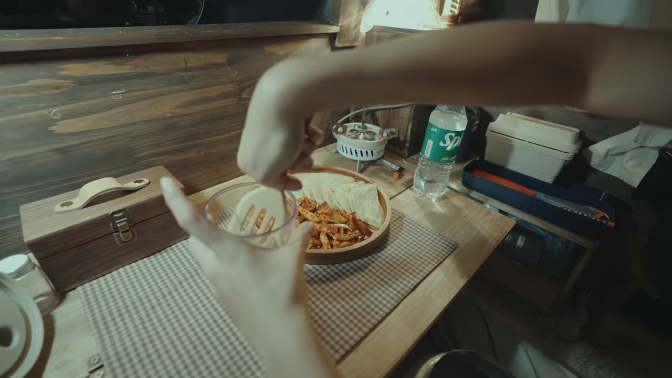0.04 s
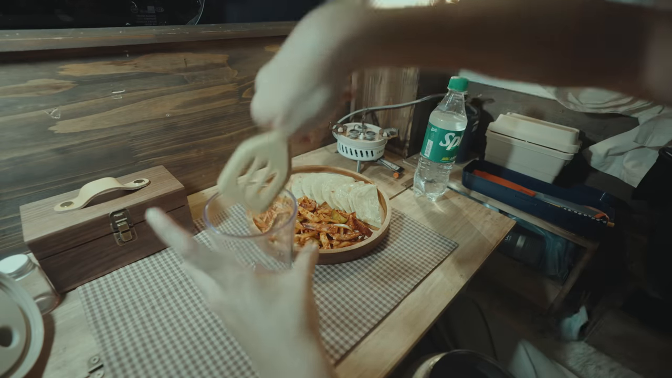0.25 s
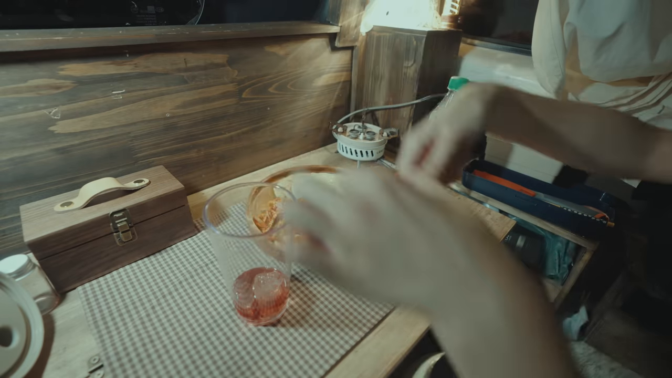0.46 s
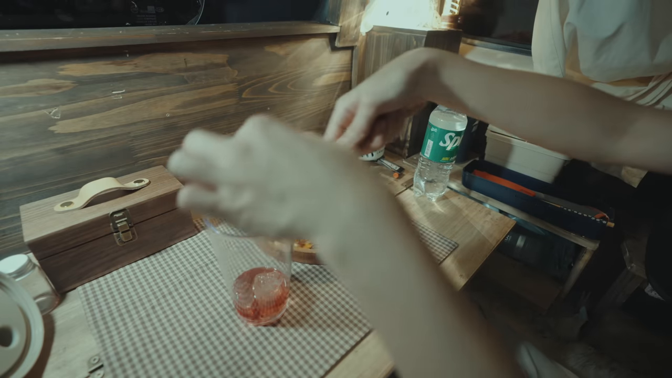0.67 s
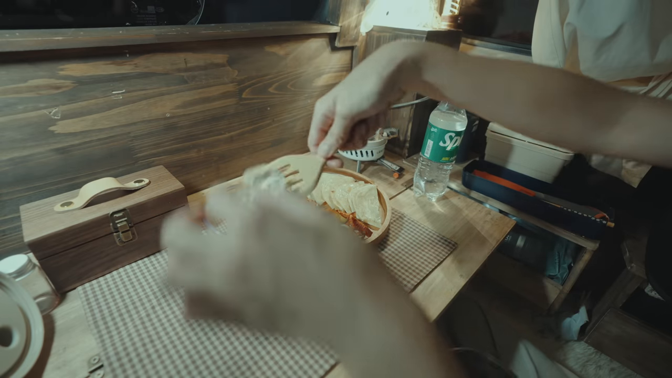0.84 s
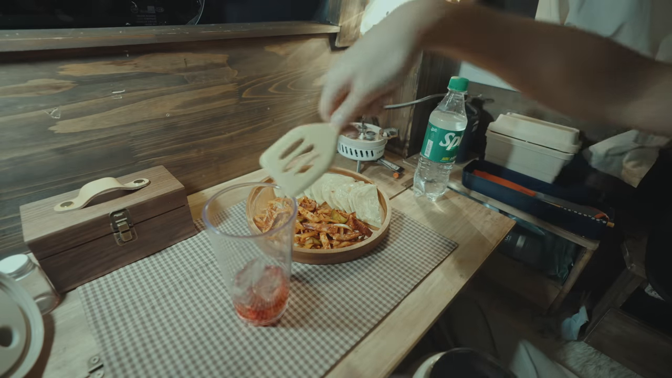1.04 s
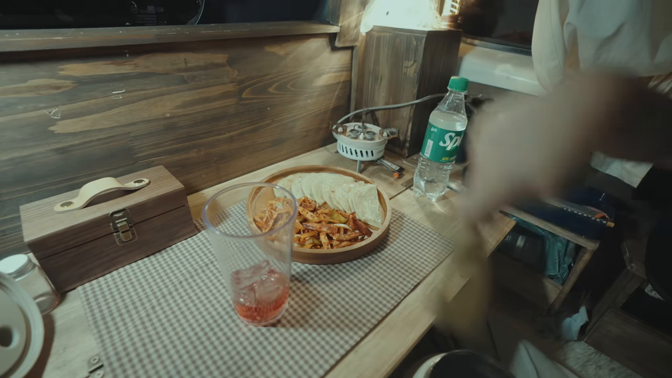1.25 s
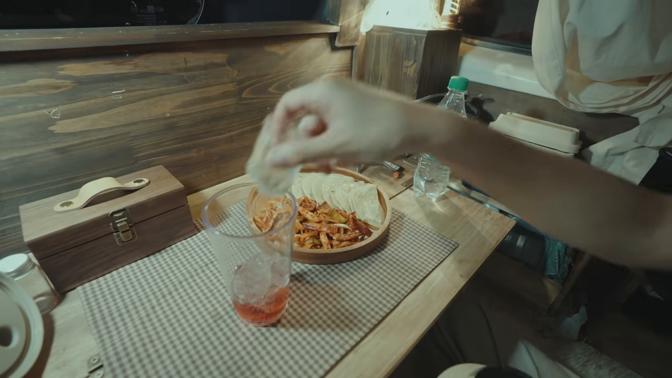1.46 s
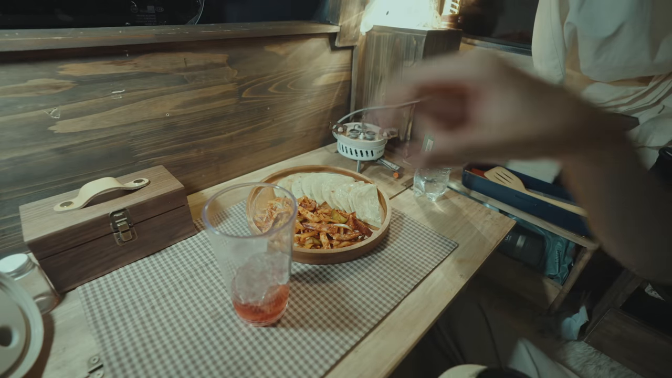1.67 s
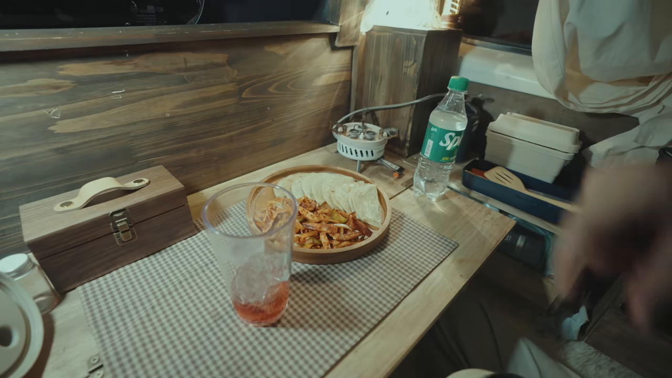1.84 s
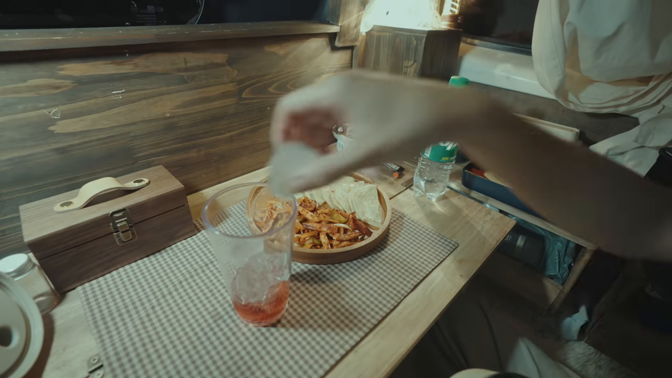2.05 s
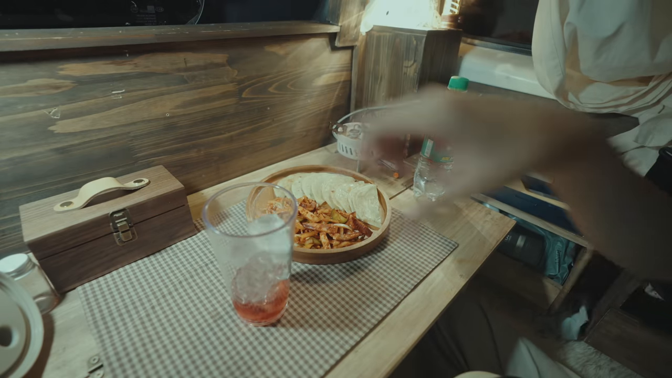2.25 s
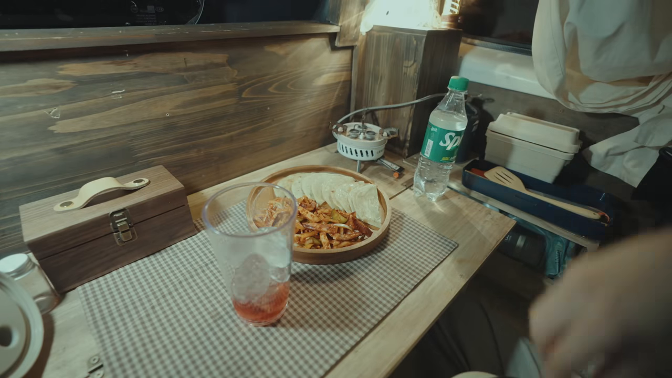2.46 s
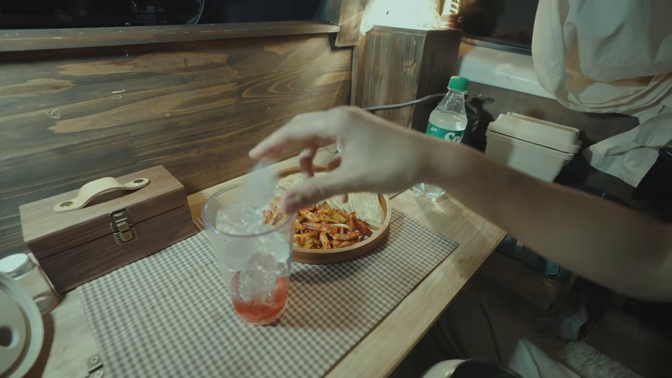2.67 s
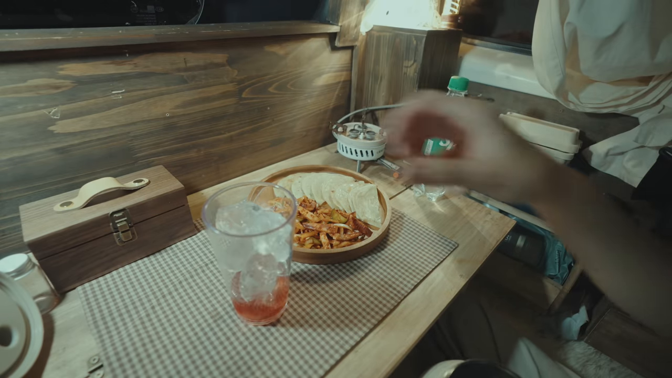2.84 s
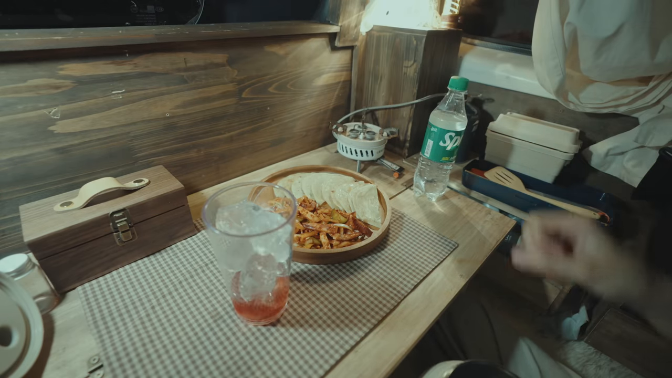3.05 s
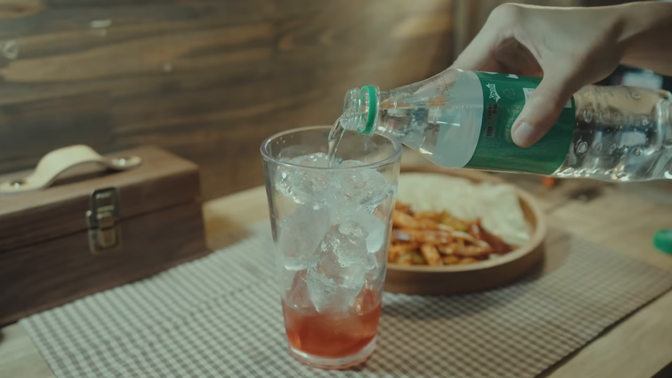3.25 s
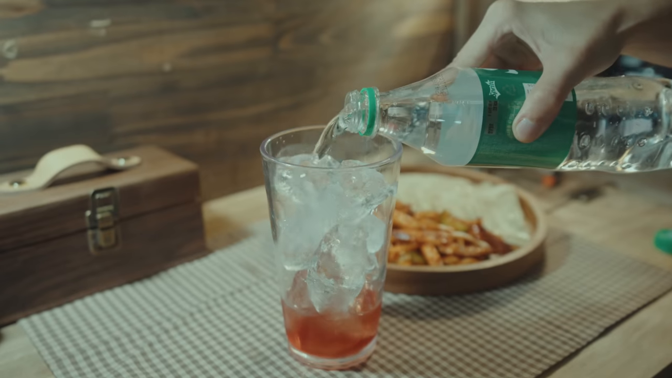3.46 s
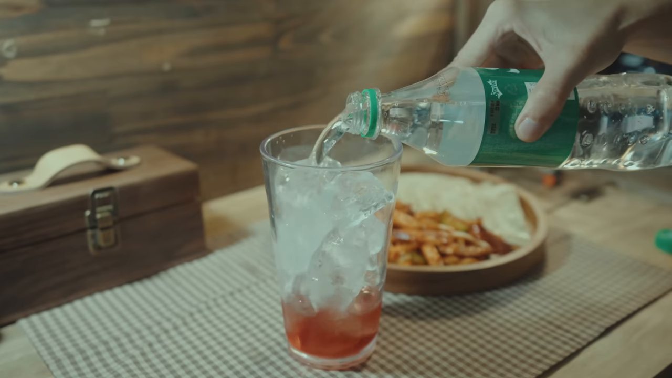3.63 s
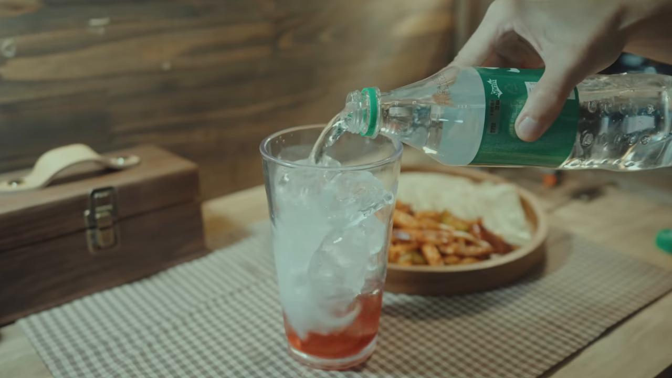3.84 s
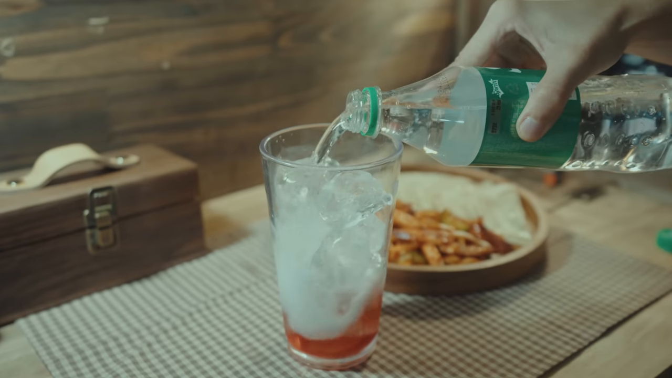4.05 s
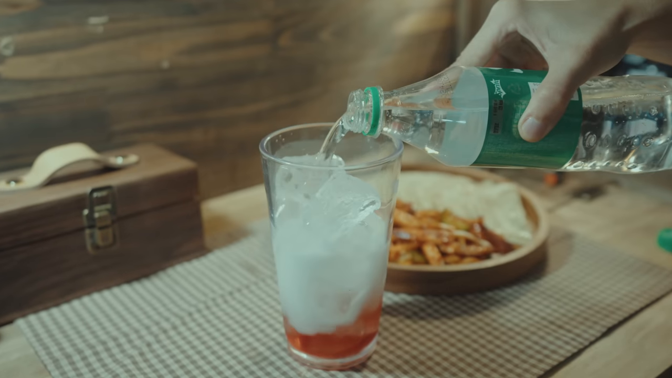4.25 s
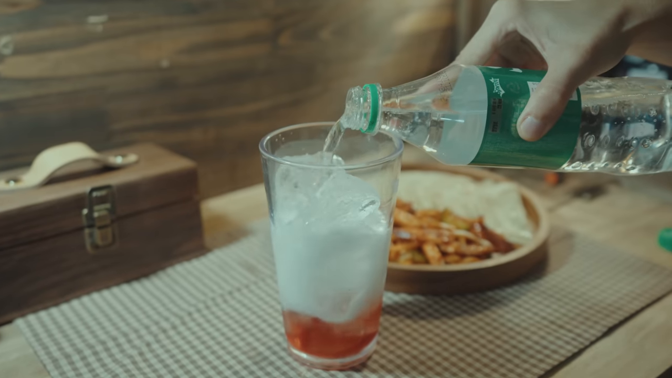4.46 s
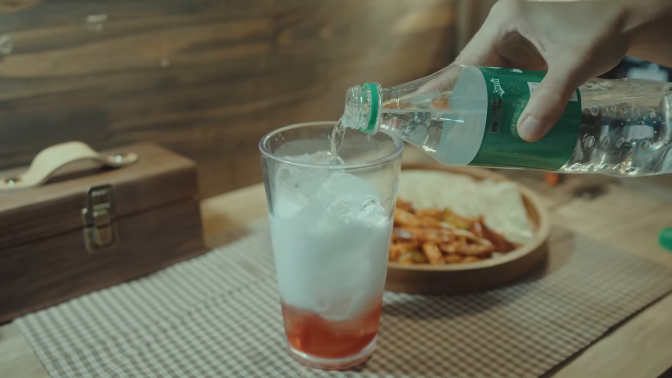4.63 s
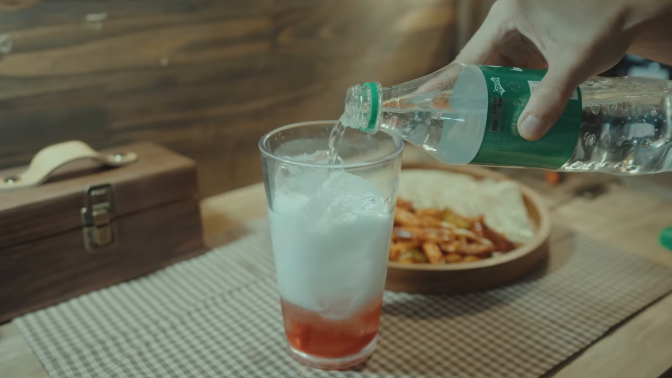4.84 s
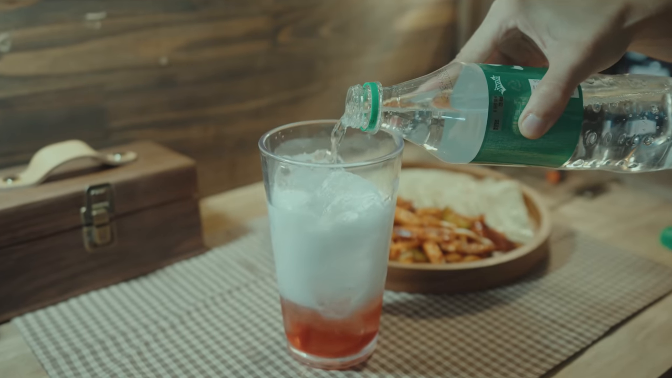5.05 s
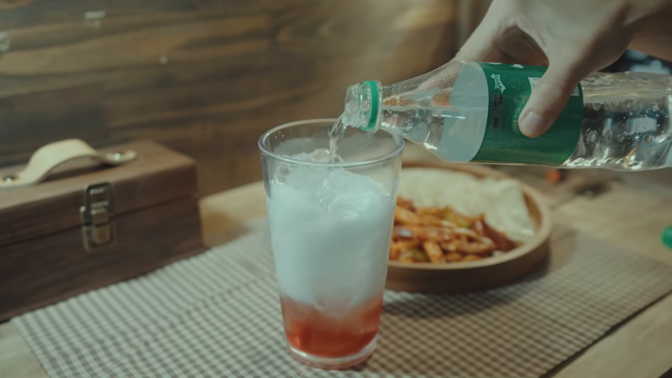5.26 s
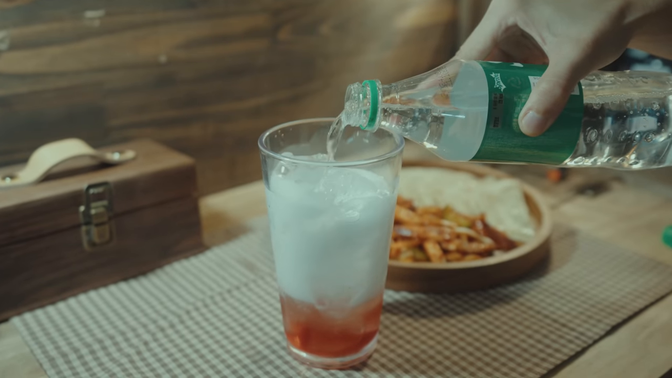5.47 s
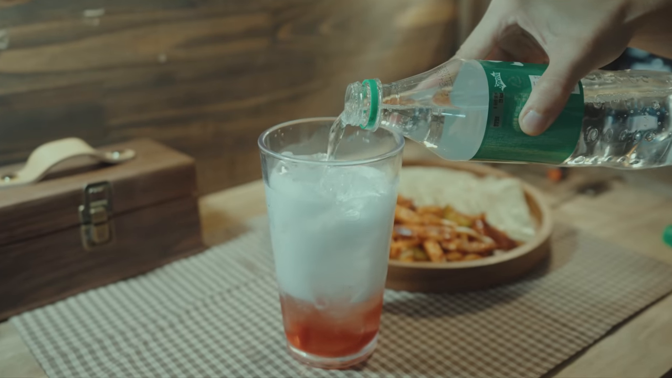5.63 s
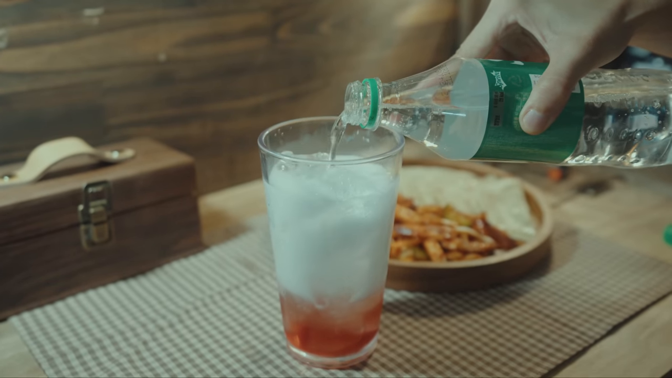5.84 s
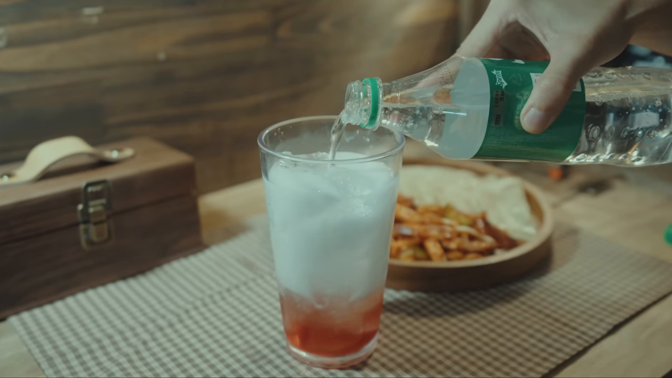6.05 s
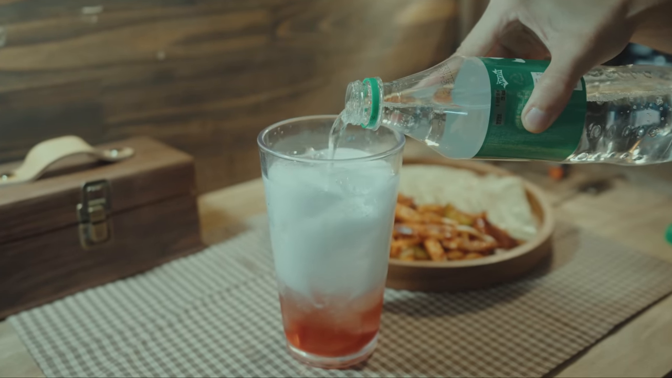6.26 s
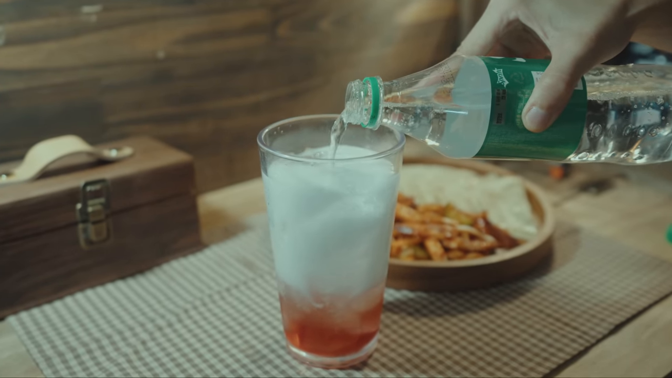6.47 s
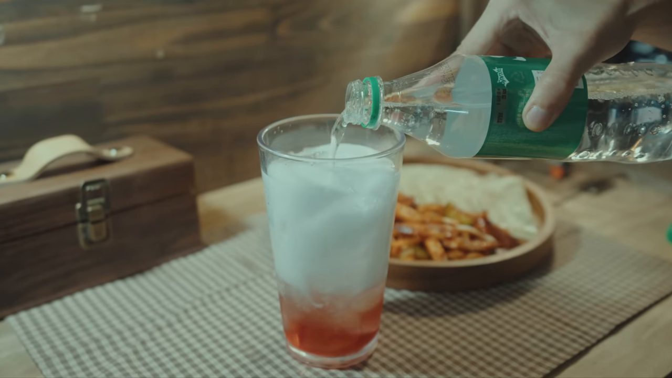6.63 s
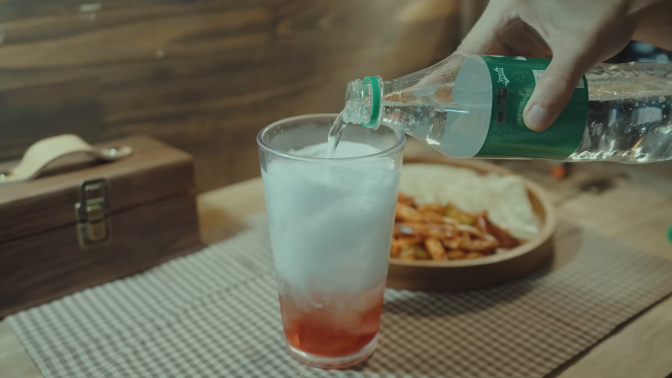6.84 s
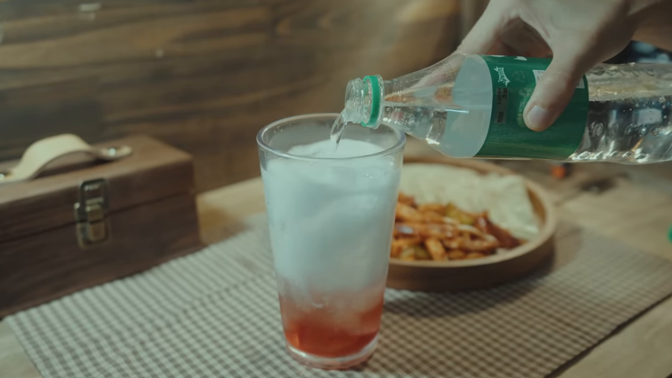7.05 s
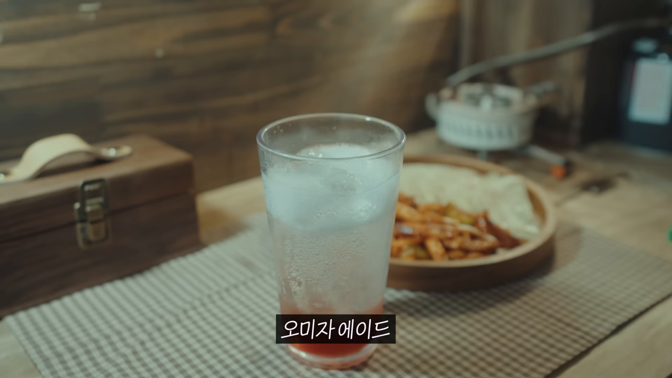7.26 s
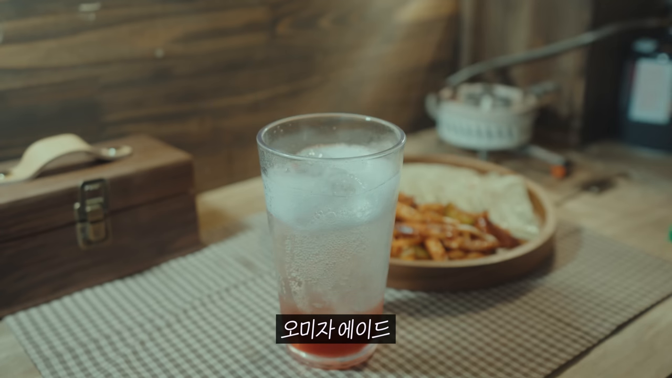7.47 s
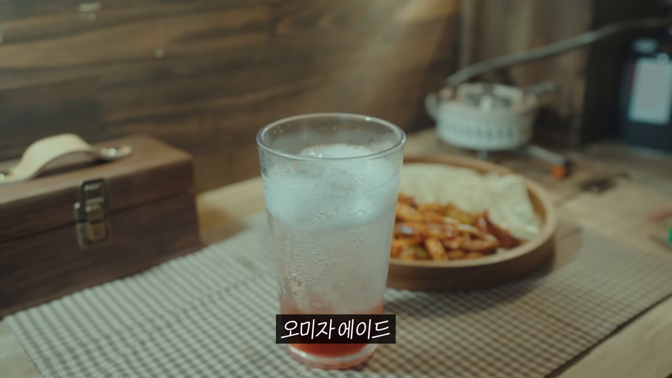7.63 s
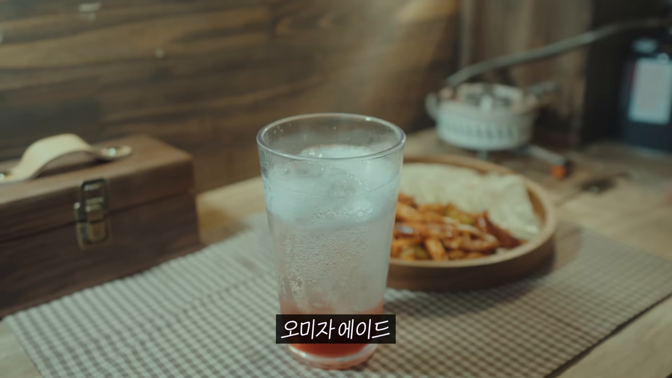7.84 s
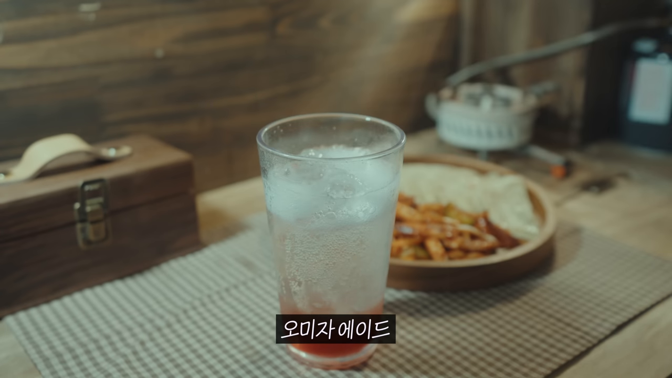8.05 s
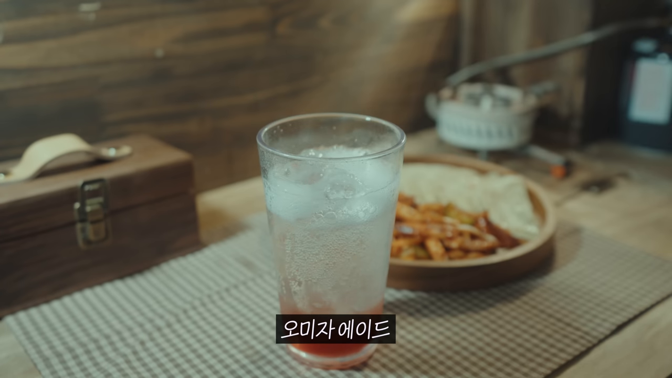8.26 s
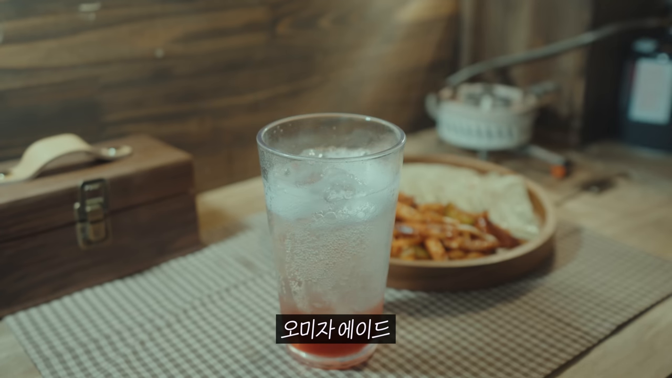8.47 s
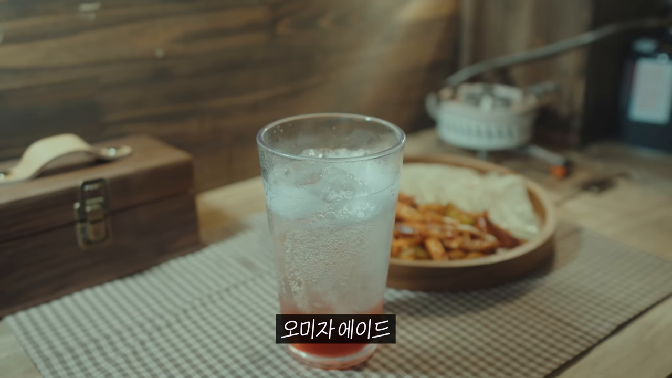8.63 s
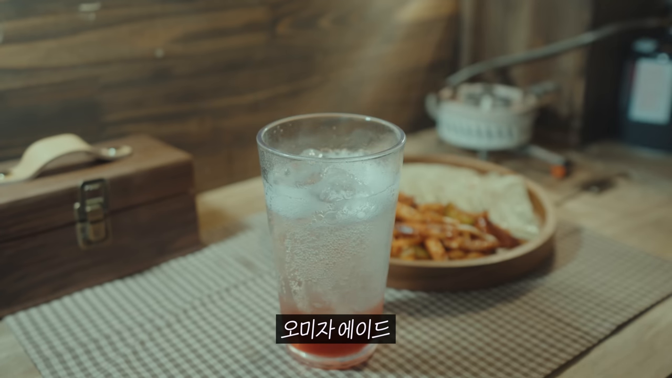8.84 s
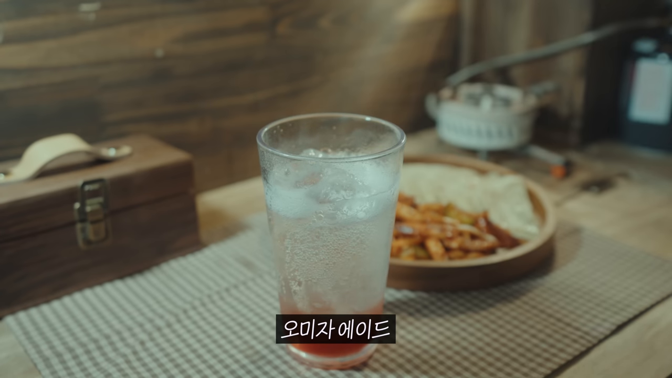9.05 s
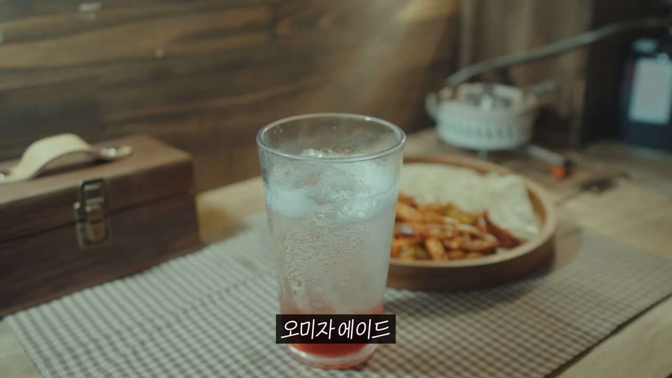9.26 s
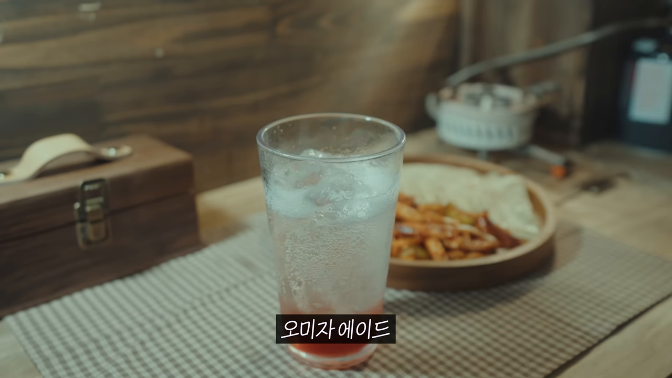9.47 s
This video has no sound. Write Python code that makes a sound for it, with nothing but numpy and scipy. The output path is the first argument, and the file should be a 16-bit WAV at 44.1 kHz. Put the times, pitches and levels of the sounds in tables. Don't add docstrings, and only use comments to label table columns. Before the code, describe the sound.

Close, dry sound at a wooden table: ice tumbles into a glass in separate clattering bursts, ringing at first, duller as it fills. A fizzy drink is poured, cubes shift with muffled knocks, and bubbles hiss steadily. The last shot brings closer, louder fizz, small low plops and delicate brim ticks, over faint room rumble and a very high, thin insect trill.

```python
import sys
import numpy as np
from scipy import signal
from scipy.fft import rfft, irfft, next_fast_len
from scipy.io import wavfile
from scipy.ndimage import uniform_filter1d

SR = 44100
rng = np.random.default_rng(int(sys.argv[2]) if len(sys.argv) > 2 else 0)


def volts(x):
    e = np.asarray(x, float) / 20
    return 10 ** e


def master_out(mix):
    frames = np.transpose(np.atleast_2d(mix))
    ceiling = np.clip(frames, -1, 1)
    pcm = np.round(ceiling * 32767).astype(np.int16)
    wavfile.write(sys.argv[1], SR, pcm)


N = 418950

# start_s, peak_db
SCENE_CHANGES = [
    (0.4948, -47.5),
    (1.9955, -61.5),
    (3.2056, -56),
]
# pitch_hz, level_db (per Hz)
ROOM_COLOUR = [(42, -5.5), (170, -17.5), (3000, -45.5), (4600, -40.5), (5300, -54), (10000, -55),
               (11500, -35), (14000, -62.5)]
# start_s, level_db
ROOM_LEVEL = [(0, -39), (.5, -54.5), (3.2, -53.5), (7.1, -53.5), (7.3, -51), (9.5, -47)]
# start_s, level_db, strokes_per_s, near_share (0-1)
CRICKET = [(0, -46, 157, 0.8), (.49, -39, 157.3, 0.77), (1.3, -40.5, 156.2, 0.77), (3.19, -41, 157, 0.75),
           (3.21, -40, 150, 0.26), (7.17, -40, 162, 0.3), (7.24, -29, 162, 0), (9.5, -31, 180, 0)]
# pitch_hz, level_db (per Hz)
WING_COLOUR = [(6180, -94), (10500, -47.5), (12300, -23.5), (12600, -19.5), (13600, -6.5), (14100, -6.5),
               (15000, -6.5), (15900, 7.5)]
# pitch_hz, level_db (per Hz)
CHORUS_COLOUR = [(9000, -37), (11800, -15.5), (12700, -8), (13400, -15), (14300, -7), (15200, 3),
                 (15690, 3.5), (15900, -0.7)]
# start_s, loudest_s, end_s, loudest_db
RATTLES = [(0, 0.174, 0.2, -24.5), (0.04, 0.06, 0.11, -35), (0.966, 1.04, 1.18, -24),
           (1.04, 1.162, 1.4, -24), (1.599, 1.62, 1.9, -18.5), (1.627, 1.674, 1.838, -18.5),
           (2.188, 2.235, 2.33, -21), (2.27, 2.395, 2.45, -21), (3.555, 3.582, 3.76, -20.5),
           (4.08, 4.18, 6.3, -43), (4.245, 4.28, 4.04, -39)]
# pitch_hz, level_db (per Hz)
CRUNCH_COLOUR = [(250, -6), (600, 0), (1500, -6.5), (2300, 4), (4000, 1), (7000, -22.5), (12000, -30.5)]
# pitch_hz, level_db
EMPTY_WALL = [(1250, -7.5), (1620, -5), (1950, -10), (2550, -3.5), (2900, -9), (3300, -3), (3620, -8.5),
              (4580, -10), (5400, -8.5), (6500, -12), (7000, -14.5), (7700, -16)]
# pitch_hz, level_db
LOADED_WALL = [(1420, -2), (1900, -5.5), (2170, -2), (2430, -6), (3010, -12), (3340, -9.5), (4150, -8.5),
               (4960, -7.5), (5400, -11), (5910, -8.5), (6520, -10.5), (7420, -15)]
# start_s, peak_db
RIM_NOTES = [(0.1051, -22), (0.132, -33), (0.2, -34.5), (0.314, -51), (0.403, -49), (0.939, -32),
             (0.9841, -22.5), (1.04, -33), (1.085, -37), (1.13, -32), (1.18, -44), (1.223, -55)]
# start_s, peak_db, pitch_hz, t60_s
LINGERING_NOTES = [(0.0, -35, 1250, 0.12), (0.038, -21.5, 4600, 0.017), (.038, -25.5, 6570, 0.022),
                   (.037, -27.5, 3670, 0.058), (0.041, -18.5, 2525, 0.056), (.046, -26, 1620, 0.097),
                   (0.051, -34, 1210, 0.18), (0.071, -17, 1710, 0.038), (.068, -35.5, 2880, 0.1),
                   (.131, -25, 4700, .016), (0.136, -34, 2450, .05), (.15, -30, 1950, 0.075),
                   (.173, -28, 3210, 0.022), (.937, -29, 5340, 0.021), (.938, -29.5, 2020, 0.032),
                   (0.939, -40.5, 1410, 0.062), (.998, -23.5, 2500, 0.11), (.996, -19, 746, 0.066),
                   (1.025, -16.5, 744, 0.038), (1.03, -16.5, 4230, 0.021), (1.075, -26, 2300, .04),
                   (1.086, -23, 753, 0.044), (1.123, -22, 2522, 0.067), (1.165, -39, 3360, 0.09),
                   (1.604, -26, 2300, 0.037), (1.604, -28, 4720, .02), (1.612, -25, 3320, 0.04),
                     (1.633, -13, 780, .025), (1.636, -24, 3310, 0.022), (1.64, -21, 6670, 0.02),
                     (1.642, -32, 1945, 0.21), (1.689, -25, 2340, .03), (1.69, -31, 4070, .02),
                     (1.747, -40, 4340, 0.027), (1.76, -48, 2700, 0.053), (2.187, -22, 803, 0.041),
                     (2.187, -18.5, 2120, 0.046), (2.19, -23.5, 1910, 0.12), (2.228, -30, 2210, 0.072),
                     (2.215, -20, 5050, 0.021), (2.264, -26, 2200, 0.052), (2.309, -35, 6600, 0.018),
                     (2.31, -28.5, 802, 0.14), (2.33, -38, 3000, 0.051), (2.353, -25, 813, 0.068),
                     (2.356, -27, 1940, 0.091), (2.365, -28, 4000, 0.018), (2.372, -35, 776, .08),
                     (2.603, -51.5, 1920, 0.066), (2.74, -21, 3440, 0.02), (2.738, -33, 4930, .02),
                     (2.824, -28, 4970, 0.019), (2.823, -23.5, 5960, 0.018), (3.36, -61, 1950, .025),
                     (3.426, -52, 1950, 0.028), (4.282, -30, 2120, 0.03)]
# start_s, peak_db, pitch_hz, t60_s
PLOPS = [(4.043, -37, 734, 0.05), (4.131, -30, 745, 0.046), (4.145, -32, 730, 0.03),
         (4.255, -35.5, 1080, 0.096), (4.256, -63, 2130, 0.054), (6.15, -47, 486, 0.063),
         (6.622, -50, 340, 0.029), (8.157, -39, 352, 0.17), (8.197, -36, 337, 0.064),
         (8.267, -37, 338, 0.044), (8.278, -28, 350, 0.026), (8.624, -23.5, 370, 0.026),
         (9.212, -27.5, 360, 0.044)]
# start_s, clink_t60_s, knock_t60_s, crunch_db (re clink)
FILL = [(0, 0.036, 0.036, -7), (1.3, 0.029, 0.027, -3.5), (1.6, .03, 0.029, -2), (2.4, 0.027, 0.037, -2.5),
        (3.001, 0.02, 0.015, 0), (3.5, 0.016, 0.03, -2.5), (3.7, 0.0093, 0.036, -5),
        (4.4, 0.014, 0.011, -17), (7.1, 0.025, 0.021, -21), (8.1, 0.012, 0.031, 3)]
# start_s, knock_hz
COLUMN = [(0, 696), (1.1, 737), (1.7, 819), (3.6, 748)]
# start_s, peak_db, clink_hz, knock_db, crack_db (both re clink)
SCOOP_1 = [(0.0084, -30, 1540, -21, 2), (0.0267, -10, 2500, 0, -44), (0.0348, -11.5, 1770, -27, -5),
           (0.073, -32, 1700, -32, -43.5), (0.1014, -17, 2700, -11, -5), (0.1094, -14, 2480, -15, -20),
           (0.1311, -16.5, 2280, -11, -10.5), (0.1632, -18.5, 3300, -5, -20), (0.184, -26, 2200, -11, -3),
           (0.256, -60, 3200, -20, -20), (0.301, -43, 2520, -24, -14), (0.308, -42, 1350, -10, -19),
           (0.314, -40, 4300, -23, -14), (0.345, -53, 3300, -20, -20), (0.359, -53, 2500, -9, -12),
           (0.384, -51, 2720, -10, -20), (0.399, -36.5, 3340, -20, -18), (0.472, -52.5, 2050, 0, -7)]
SCOOP_2 = [(0.9365, -20, 2500, -3.5, -0.5), (0.9793, -15.5, 2470, -8, -1.5), (0.9956, -12, 2570, -4.5, -5),
           (1.0122, -11.5, 2340, -16, -11), (1.0246, -10.5, 1970, -19, -17), (1.073, -15.5, 2470, -26, -17),
           (1.0874, -19.5, 2230, -9.5, -32), (1.104, -23.5, 3200, 4, -31), (1.119, -10.5, 2390, -31, -12),
           (1.1595, -26, 3300, -5.5, -9), (1.19, -28, 2220, 1, -11), (1.221, -23.5, 2160, -6.5, -14),
           (1.2446, -27.5, 2080, 0.5, -9)]
SCOOP_3 = [(1.6021, -11.5, 2350, -7.5, -3.5), (1.6124, -14.5, 3130, -9, -33), (1.6346, -13, 1980, -3, -14),
           (1.641, -18, 2000, -24, 1.5), (1.6671, -26, 1930, -8, -1), (1.6844, -18.5, 2230, -2, -7),
           (1.719, -28.5, 2300, -2, -12), (1.731, -47, 5770, -10, -5), (1.744, -39, 1560, -3, -21),
           (1.757, -48, 6500, -6, -6), (1.766, -54, 6300, -8, -10), (1.829, -38, 2300, -2, -8),
           (1.92, -45.5, 2300, -2, -30)]
SCOOP_4 = [(2.1865, -12, 2190, -27, -7.5), (2.1906, -14, 1970, 1, -35), (2.2144, -13.5, 3460, -3.5, -2.5),
           (2.2624, -23, 2180, -8, -11), (2.2915, -21.5, 2180, -4, -9), (2.3094, -18.5, 1850, -7, -2.5),
           (2.3274, -19.5, 2940, 2, -10), (2.3435, -31, 5840, -8, -4), (2.353, -17, 1510, -1, -8),
           (2.3646, -22.5, 1920, 4, -7), (2.3905, -17, 2320, -2, -9), (2.406, -33, 2200, 1, -9),
           (2.5815, -51, 3600, -12, 12), (2.6017, -43, 1930, -31, 10)]
SCOOP_5 = [(2.7373, -12.5, 2280, -5, -8.5), (2.7433, -27.5, 2590, 1.5, -22), (2.7775, -30, 1740, 9, -7),
           (2.799, -45, 3570, -9, -3.5), (2.8221, -18.5, 4000, -3, -4), (2.8287, -12, 1720, -9, -11),
           (2.848, -27, 1690, 4, -19), (2.9004, -26, 2260, 0, 0.5)]
# start_s, peak_db, clink_hz, knock_db (re clink)
PUSHED = [(3.509, -39, 1610, 7), (3.5237, -27, 1600, 2.5), (3.5728, -22, 1510, 0.5),
          (3.5864, -14.5, 2070, -3), (3.5974, -15.5, 2080, -6), (3.6093, -28.5, 2000, 7.5),
          (3.68, -30.5, 1950, -0.5), (3.7214, -35.5, 1600, -3), (3.7579, -43, 1310, 6),
          (3.91, -40, 2500, -1)]
# start_s, peak_db, clink_hz, knock_db, crack_db (both re clink)
CRAZING = [(3.4435, -50, 4100, -20, 2.5), (3.466, -54, 3220, -22, -10), (3.68, -49, 3000, -20, 10),
           (3.705, -39, 3540, -20, -18), (3.7655, -45, 4480, 0, 6), (3.824, -45.5, 1300, -6, -28),
           (3.8528, -41.5, 4440, -10, 3), (3.893, -41, 4360, -11, -15), (3.933, -46, 4200, -18, -15),
           (3.981, -40.5, 1190, -7, -28), (4.694, -44.5, 1500, -32, -25)]
# start_s, peak_db, knock_hz, knock_db (re clink)
SUNK = [(4.0426, -29, 1080, 3.5), (4.0831, -41.5, 744, 14), (4.1041, -35, 370, 3.5), (4.129, -47, 1030, 14),
        (4.144, -42.5, 710, 20), (4.164, -35, 1070, 14), (4.1799, -42.5, 960, 14.5),
        (4.2553, -42, 1040, 13), (4.2809, -24.5, 1130, 6), (4.644, -48, 1540, -1), (5.36, -39.5, 540, 7),
        (5.436, -29.5, 900, -1), (5.4576, -37, 330, 6.5), (6.1685, -47, 500, 7.5), (6.225, -53.5, 480, 9.5),
        (6.622, -42.5, 340, -2.5)]
# start_s, peak_db, clink_hz, knock_db (re clink)
AFLOAT = [(8.158, -37, 3120, -18), (8.198, -34, 3180, -19), (8.2634, -30.5, 2880, -9),
          (8.2765, -24, 4110, -23), (8.357, -28.5, 4360, -29), (8.362, -24, 2670, -17),
          (8.405, -19.5, 2510, -12), (8.4414, -25, 3080, -18), (8.4724, -16.5, 2960, -35),
          (8.512, -15, 2800, -29), (8.6194, -26.5, 2680, -21), (8.626, -22, 2760, -4),
          (8.6425, -17.5, 3550, -14), (8.6546, -27.5, 2770, -29), (9.212, -25, 3230, -11),
          (9.222, -26.5, 2570, -27), (9.366, -38, 3200, -30), (9.402, -27, 4170, -33),
          (9.42, -30, 3200, -17), (9.455, -33, 4150, -30), (9.4645, -21, 2740, -38)]
# start_s, peak_db, clink_hz, knock_db, crack_db (both re clink)
SPLIT = [
    (7.32, -31, 4400, -10, 9.5),
]
# start_s, peak_db, boom_db (re peak)
THUDS = [(0.025, -16.5, -14), (0.105, -19.5, -6.5), (0.995, -14, -24), (1.023, -22, -6),
         (1.074, -19.5, -11), (1.121, -26, 1), (1.162, -21, -14.5), (1.599, -7, -23), (1.688, -26.5, 1),
         (2.265, -34, 0), (2.285, -17, -5.5), (2.385, -22.5, -13), (2.78, -21, 0.5), (2.827, -17, -11),
         (4.128, -28, -5), (4.278, -31, -4.5), (5.427, -33, -15)]
# start_s, peak_db, boom_db (re peak)
FLEXES = [
    (2.183, -20, -2),
    (2.213, -26, -17),
    (2.352, -23, 0),
    (2.736, -19.5, -1.5),
    (3.58, -25, -1),
    (3.64, -57, 31.5),
]
# start_s, peak_db, start_hz, end_hz, length_s
SLIDES = [
    (0.128, -29, 1950, 2750, 0.024),
    (0.066, -35.5, 700, 640, 0.035),
    (0.083, -32, 1700, 1600, 0.023),
    (5.436, -40, 1630, 1320, 0.0098),
    (5.457, -45, 343, 240, 0.017),
    (2.325, -32, 690, 900, .06),
    (7.4, -49.5, 360, 300, 0.048),
    (9.213, -35, 330, 390, 0.022),
]
# start_s, length_s, pitch_hz, level_db
GURGLES = [
    (0.241, 0.28, 433, -61),
    (7.24, 0.13, 362, -61),
    (8.155, 0.125, 340, -53),
]
# start_s, level_db
FIZZ_LEVEL = [(3.2, -96.5), (3.42, -74), (3.515, -62), (3.535, -65), (3.7, -58), (4.3, -52.5), (7.17, -55),
              (7.23, -43.5), (9.5, -47)]
# pitch_hz, level_db (per Hz)
FIZZ_COLOUR = [(3500, -7.5), (5200, 10), (7300, 13.5), (8500, 12.5), (10000, 11), (12000, 12.5),
               (13500, -14), (16000, -9)]
# pitch_hz, width_hz, level_db
HOLLOW = [(1080, 70, 0), (1350, 20, -5.5), (1600, 250, -4.5), (2080, 43, -2), (2580, 83, -8),
          (2950, 690, -8.5), (4426, 330, -0.5)]

FULL_S = 7.2
BOARD_HZ, FLEX_HZ, BOOM_HZ = 224.8, 148.8, 65.7
RIM_HZ, RIM_T60_S = 1120, 0.18
SUNK_CLINK_HZ, BRIM_KNOCK_HZ = 1463, 352
WET_CRACK_DB, BRIM_CRACK_DB = -15.5, -13


def evened(x):
    return x / np.sqrt(np.mean(x ** 2) + 1e-20)


def peaked(x):
    return x / np.max(abs(x))


def read(points, hz):
    f, value = np.transpose(points)
    return np.interp(np.log(hz + 1), np.log(f + 1), value)


def follow(rows):
    s, *columns = np.transpose(rows)
    return [np.interp(np.arange(N) / SR, s, c) for c in columns]


def add(mix, s, sound):
    part = mix[round(s * SR):][:len(sound)]
    part += sound[:len(part)]


def colour(x, gain_db):
    size = next_fast_len(N)
    gain = volts(gain_db(np.fft.rfftfreq(size, 1 / SR)))
    return evened(irfft(rfft(x, size) * gain, size)[:N])


def ring(hz, t60, size=6000):
    t = np.arange(size) / SR
    return volts(-60 * t / t60) * np.sin(2 * np.pi * hz * t)


def clicks(per_s, spread_db):
    size = volts(spread_db * np.minimum(rng.exponential(1, N), 5)) * rng.choice([-1., 1.], N)
    return size * (rng.random(N) < per_s / SR)


def cabin():
    frames = N // 256 + 5
    a, b, patches = rng.standard_normal((frames, 513, 3)).T
    patches = evened(uniform_filter1d(uniform_filter1d(patches, 8, 0), 14, 1))
    drifting = signal.istft((a + 1j * b) * volts(2.16 * patches), nperseg=1024, noverlap=768)[1][:N]
    insect_band = signal.butter(4, (7440, 8700), "band", fs=SR, output="sos")
    insects = evened(signal.sosfilt(insect_band, drifting))
    room = colour(drifting, lambda hz: read(ROOM_COLOUR, hz))
    return volts(follow(ROOM_LEVEL)[0]) * room + volts(-73.5) * insects


def cricket():
    db, per_s, near = follow(CRICKET)
    near = np.clip(near, 0, 1)
    wander = uniform_filter1d(rng.standard_normal(N), 300)
    count = np.floor(np.cumsum(per_s * (1 + 0.19 * wander)) / SR)
    strokes = np.diff(count, prepend=0) * volts(19 * wander)
    t = np.arange(110) / SR
    chirp = np.sin(2 * np.pi * (16800 * t - 840000.0 * t ** 2)) * signal.windows.tukey(len(t), .4)
    sung = colour(np.convolve(strokes, chirp)[:N], lambda hz: read(WING_COLOUR, hz))
    leaves = rng.standard_normal(2500) * np.exp(-np.arange(2500) / 500.)
    echoes = evened(signal.oaconvolve(sung, leaves)[:N])
    hiss = rng.standard_normal(N)

    def singers_db(hz):
        voices_hz, width_hz = (15073, 15180, 15452, 15500, 15600), 40
        return 10 * np.log10(1 + sum(2.1 / (1 + (2 * (hz - f) / width_hz) ** 2) for f in voices_hz))

    early_blur = evened(echoes + 0.7 * colour(hiss, lambda hz: read(WING_COLOUR, hz)))
    late_blur = colour(hiss, lambda hz: read(CHORUS_COLOUR, hz) + singers_db(hz))
    early = np.arange(N) < SCENE_CHANGES[-1][0] * SR
    blur = np.where(early, early_blur, late_blur)
    return volts(db) * (np.sqrt(near) * sung + np.sqrt(1 - near) * blur)


def rattle():
    scrape_t60_s = .05
    scrapes, which = clicks(3800, 3.5), rng.integers(0, len(LOADED_WALL), N)
    rung = np.zeros(N)
    for k, (hz, db) in enumerate(LOADED_WALL):
        rung += signal.oaconvolve(scrapes * (which == k), volts(db) * ring(hz, scrape_t60_s, size=2000))[:N]
    rung += signal.oaconvolve(scrapes * (which < 2), volts(-2) * ring(790, scrape_t60_s, size=2000))[:N]
    ground = colour(scrapes, lambda hz: read(CRUNCH_COLOUR, hz))
    level = np.zeros(N)
    for *s, loudest_db in RATTLES:
        db = loudest_db + np.array([-13, 0, -54.5])
        t = np.arange(s[0], s[-1], 1 / SR)
        add(level, s[0], volts(np.interp(t, s, db)) * signal.windows.tukey(len(t), .15))
    dry_ice = evened(.9 * evened(rung) + ground)
    drowned = colour(dry_ice, lambda hz: -10 * np.log10(1 + (hz / 1800) ** 4))
    return volts(-12.5) * level * np.where(np.arange(N) < 3.9 * SR, dry_ice, drowned)


def singing_notes():
    out, n = np.zeros(N), np.arange(12000)
    rim = [(s, db, RIM_HZ, RIM_T60_S) for s, db in RIM_NOTES]
    for s, db, hz, t60 in rim + LINGERING_NOTES + PLOPS:
        partner = ring(hz * rng.uniform(1.02, 1.06), 0.27 * t60, size=12000)
        pair = ring(hz, t60, size=12000) + 0.21 * partner
        soft_start = 1 - np.exp(-n / (SR * 0.022 * t60))
        add(out, s, volts(db + 0.14) * peaked(pair * soft_start))
    return out


def knocks(rows, contact_s, rise_s, wall_db, snap_db):
    out, t = np.zeros(N), np.arange(2600) / SR
    when, *fill = np.transpose(FILL)
    high = signal.butter(3, 4500, "high", fs=SR, output="sos")
    bins_hz = np.fft.rfftfreq(len(t), 1 / SR)
    rise = 1 - np.exp(-t / rise_s)
    snap = peaked((1 - t / 0.00013) * np.exp(-t / 0.00011) * (1 - np.exp(-t / 0.00004)))
    for s, db, clink_hz, knock_hz, knock_db, crack_db in rows:
        clink_t60, knock_t60, crunch_db = (np.interp(s, when, c) for c in fill)
        grit = rng.standard_normal((5, len(t)))
        chance = rng.standard_normal((2 * len(LOADED_WALL), 2))

        def tilt_db(hz):
            return 0.38 * (crack_db + 17.5) * np.log2(np.maximum(hz, 2200) / 2200)

        contact = grit[0] * rise * np.exp(-t / contact_s)
        modes = EMPTY_WALL if s < SCENE_CHANGES[0][0] else LOADED_WALL
        wall = np.zeros(len(t))
        for (hz, level_db), (louder, sharper) in zip(2 * modes, chance):
            mode_t60 = clink_t60 * (1400 / hz) ** 0.33
            mode = ring(hz * (1 + .014 * sharper), mode_t60, size=2600)
            wall += volts(level_db + tilt_db(hz) + 2.2 * louder) * mode
        struck_spot = ring(clink_hz, clink_t60, size=2600)
        clink = peaked(signal.fftconvolve(contact, struck_spot + volts(wall_db) * wall))
        air = ring(knock_hz, knock_t60) + 0.5 * ring(knock_hz * 1.37, knock_t60 * 0.42)
        knock = peaked(signal.fftconvolve(contact, air))
        lumps = volts(38.4 * uniform_filter1d(grit[1], 60))
        crunch_gain = volts(read(CRUNCH_COLOUR, bins_hz) + tilt_db(bins_hz))
        ground = irfft(rfft(grit[2]) * crunch_gain, len(t))
        crunch = peaked(ground * lumps * rise * np.exp(-t / (0.27 * clink_t60)))
        crack_fade = np.exp(-t / 0.0022) + 0.12 * np.exp(-t / 0.0034)
        crack = peaked(signal.sosfilt(high, grit[3] * lumps * rise * crack_fade))
        rub = grit[4] * lumps * rise * np.exp(-t / 0.014)
        scuff = peaked(np.convolve(rub, ring(knock_hz * 0.79, 2.8 / knock_hz, size=1000)))
        add(out, s, volts(db - 1.5) * clink)
        add(out, s, volts(db + crunch_db - 1.5) * crunch)
        add(out, s + rise_s, volts(db + snap_db) * snap * np.sign(grit[0, 0]))
        add(out, s, volts(db + knock_db - 2.0) * knock)
        add(out, s, volts(db + knock_db - 8.0) * scuff)
        add(out, s, volts(db + crack_db + 2.0) * crack)
    return out


def column_hz(s):
    return np.interp(s, *np.transpose(COLUMN))


def crack_of(clink_hz, base_db):
    return base_db - 10 * np.log2(clink_hz / 2200)


def ice():
    dropped = [(s, db, hz, column_hz(s), knock_db, crack_db)
               for s, db, hz, knock_db, crack_db in SCOOP_1 + SCOOP_2 + SCOOP_3 + SCOOP_4 + SCOOP_5]
    pushed = [(s, db, hz, column_hz(s), knock_db, crack_of(hz, WET_CRACK_DB))
              for s, db, hz, knock_db in PUSHED]
    pushed += [(s, db, hz, column_hz(s), knock_db, crack_db)
               for s, db, hz, knock_db, crack_db in CRAZING]
    sunk_crack_db = crack_of(SUNK_CLINK_HZ, WET_CRACK_DB)
    sunk = [(s, db, SUNK_CLINK_HZ * rng.uniform(0.934, 1.14), hz, knock_db, sunk_crack_db)
            for s, db, hz, knock_db in SUNK]
    afloat = [(s, db, hz, BRIM_KNOCK_HZ, knock_db, crack_of(hz, BRIM_CRACK_DB))
              for s, db, hz, knock_db in AFLOAT]
    afloat += [(s, db, hz, BRIM_KNOCK_HZ, knock_db, crack_db)
               for s, db, hz, knock_db, crack_db in SPLIT]
    out = knocks(dropped, contact_s=0.0023, rise_s=0.0015, wall_db=-11.5, snap_db=-11)
    out += knocks(pushed, contact_s=0.0035, rise_s=0.0024, wall_db=-18.5, snap_db=-20)
    under = knocks(sunk, contact_s=0.0031, rise_s=0.0026, wall_db=-11.5, snap_db=-1.3)
    out += signal.sosfilt(signal.butter(2, 4000, fs=SR, output="sos"), under)
    out += knocks(afloat, contact_s=0.0016, rise_s=0.0016, wall_db=-12.5, snap_db=-1.7)
    return out


def table():
    out, push = np.zeros(N), signal.windows.hann(90)
    blows = [(*row, BOARD_HZ) for row in THUDS] + [(*row, FLEX_HZ) for row in FLEXES]
    for s, db, boom_db, board_hz in blows:
        board = ring(board_hz * rng.uniform(0.91, 1.04), 0.14, size=9000)
        board += .5 * ring(FLEX_HZ, 0.13, size=9000) + 0.23 * ring(350, 0.059, size=9000)
        boom = ring(BOOM_HZ * rng.uniform(0.82, 1.3), 0.47, size=14000)
        boom += ring(BOOM_HZ * rng.uniform(1.35, 1.5), 0.36, size=14000)
        add(out, s + .002, -volts(db - 3.0) * peaked(np.convolve(push, board)))
        add(out, s, volts(db + boom_db - 2.0) * peaked(signal.fftconvolve(push, boom)))
    return out


def slides():
    out = np.zeros(N)
    for s, db, start_hz, end_hz, length_s in SLIDES:
        hz = np.linspace(start_hz, end_hz, round(length_s * SR))
        glide = np.sin(2 * np.pi * np.cumsum(hz) / SR)
        add(out, s, volts(db) * glide * signal.windows.tukey(len(hz), .6))
    return out


def gurgles():
    out = np.zeros(N)
    for s, length_s, hz, db in GURGLES:
        puffs = rng.standard_normal(round(length_s * SR))
        pocket = signal.fftconvolve(puffs, ring(hz, 0.05))[:len(puffs)]
        add(out, s, volts(db) * evened(pocket) * signal.windows.tukey(len(puffs), .3))
    return out


def fizz():
    hiss_db, t = follow(FIZZ_LEVEL)[0], np.arange(N) / SR
    foam_s = np.where(t < FULL_S, np.maximum(t - 4.2, 0), t - FULL_S)
    hollow_db = hiss_db + 2 * foam_s
    pouring = np.clip((t - FIZZ_LEVEL[0][0]) / .02, 0, 1)
    bursts = evened(clicks(9000, 2.5)) + 0.77 * rng.standard_normal(N)
    hiss = colour(bursts, lambda hz: read(FIZZ_COLOUR, hz))

    def hollow_gain_db(hz):
        bands = sum(volts(2 * d) / (1 + (2 * (hz - f) / w) ** 2) for f, w, d in HOLLOW)
        ends = -25 / (1 + (hz / 1000) ** 6) - 30 / (1 + (5000 / (hz + 1)) ** 12)
        notch = -9.5 / (1 + ((hz - 2266) / 51) ** 2)
        return 10 * np.log10(0.0081 + bands) + ends + notch

    hollow = colour(bursts, hollow_gain_db)
    return pouring * (volts(hiss_db - 2.5) * hiss + volts(hollow_db - 5.0) * hollow)


def walls(x):
    t = np.arange(12000) / SR
    tail = rng.standard_normal(len(t)) * volts(-60 * t / 0.073) * np.clip(t / 0.00049, 0, 1)
    tail = signal.lfilter([1], [1, -.4], tail)
    return signal.oaconvolve(x, tail / np.linalg.norm(tail))[:N]


def scene():
    glass = rattle() + singing_notes() + ice() + slides() + gurgles()
    mix = cabin() + cricket() + glass + volts(-8.0) * walls(glass) + table() + fizz()
    for s, db in SCENE_CHANGES:
        add(mix, s, volts(db + 10.0) * np.array([1., -.6]))
    return mix[None]


def roll_off(x):
    return signal.sosfilt(signal.butter(12, 17140, fs=SR, output="sos"), x)


def record(dry):
    thinned = signal.sosfilt(signal.butter(2, 45, "high", fs=SR, output="sos"), dry)
    rounded = .55 * np.tanh(thinned / .55)
    steep = signal.firwin(2047, 15755, window=("kaiser", 9), fs=SR)
    limited = signal.oaconvolve(rounded, steep[None], "same")
    return roll_off(limited)


dry = scene()
out = record(dry)
master_out(out)
```